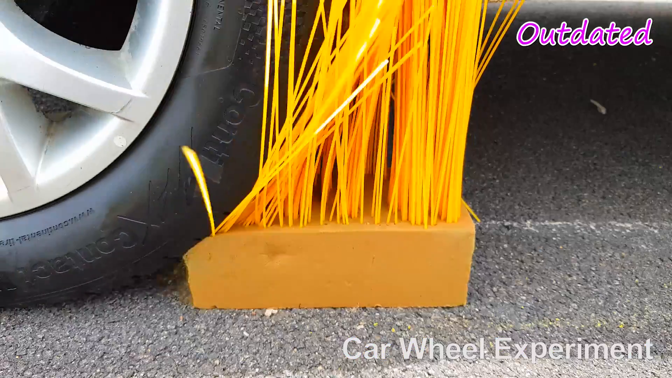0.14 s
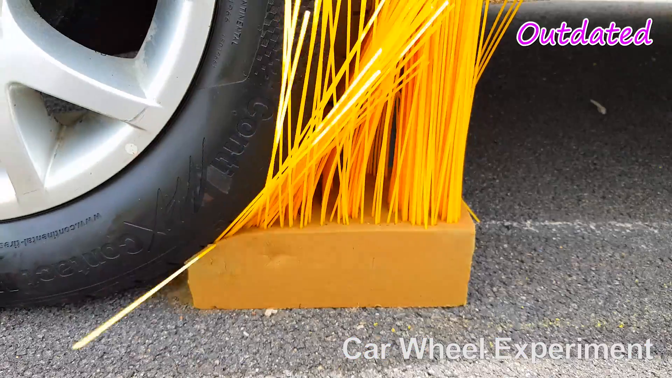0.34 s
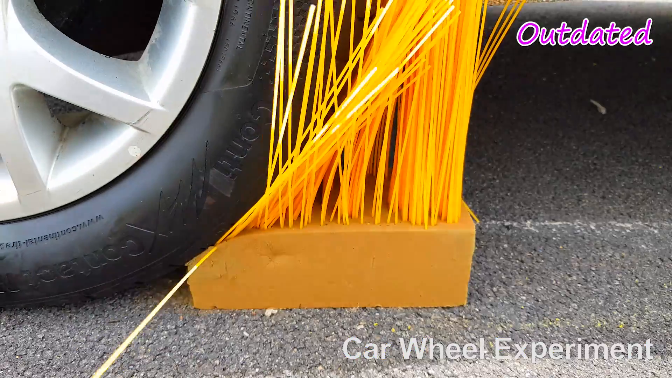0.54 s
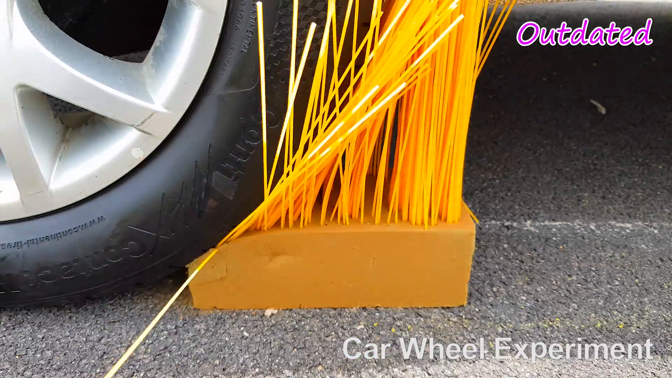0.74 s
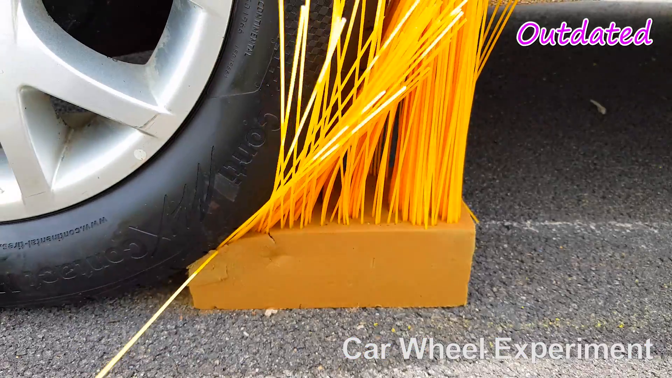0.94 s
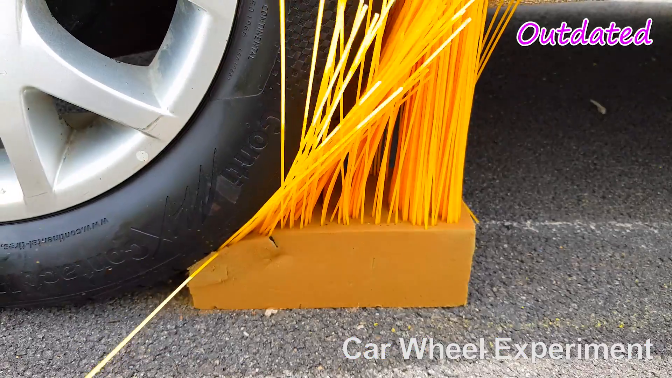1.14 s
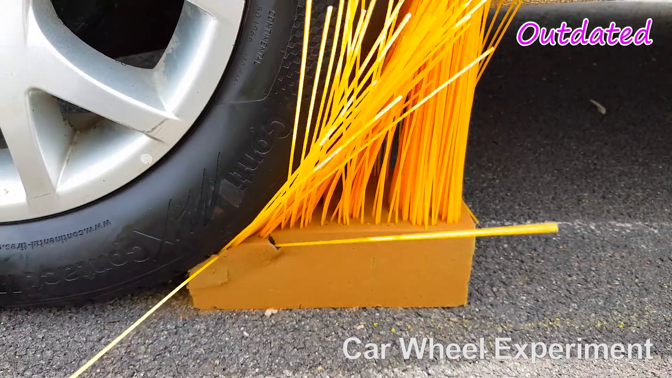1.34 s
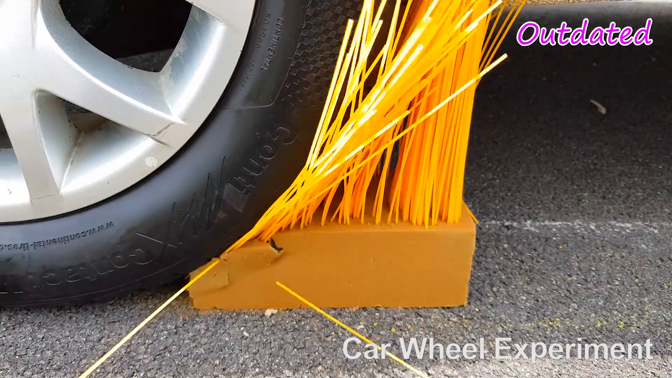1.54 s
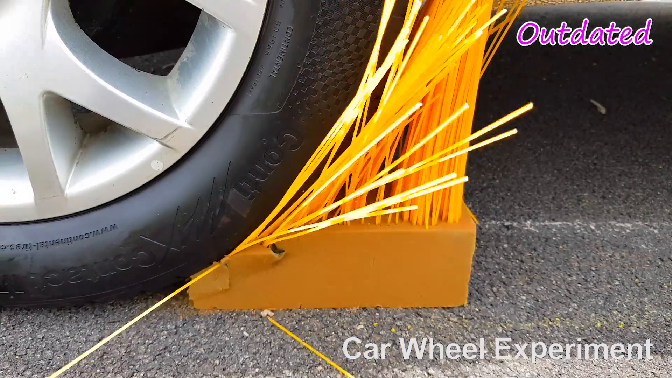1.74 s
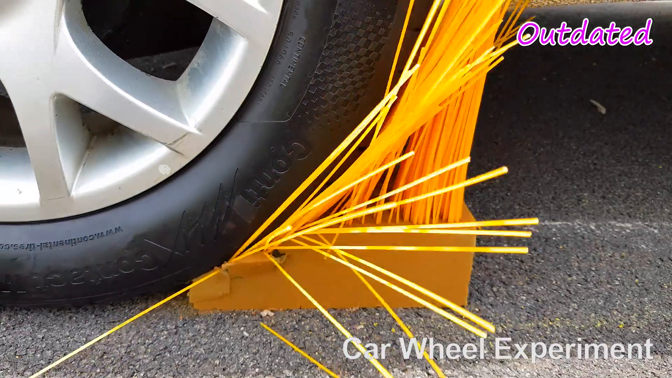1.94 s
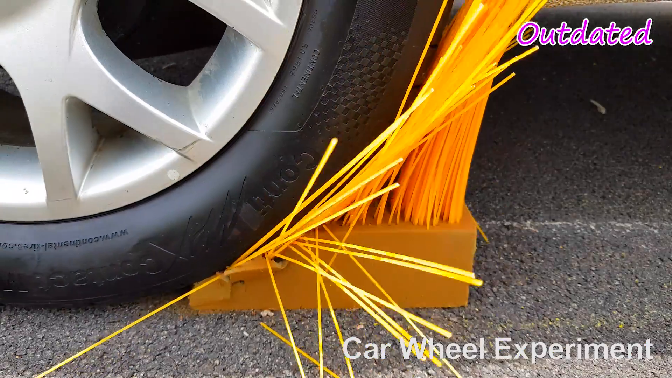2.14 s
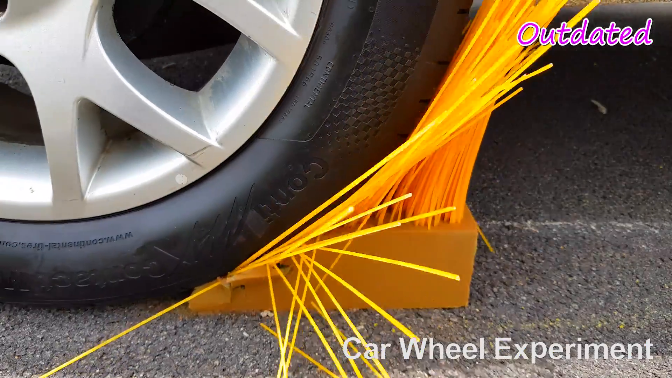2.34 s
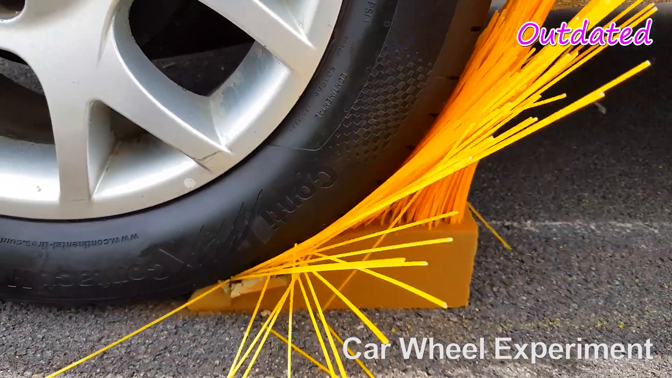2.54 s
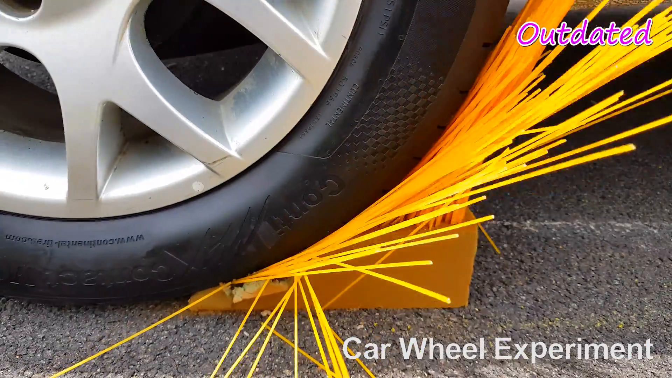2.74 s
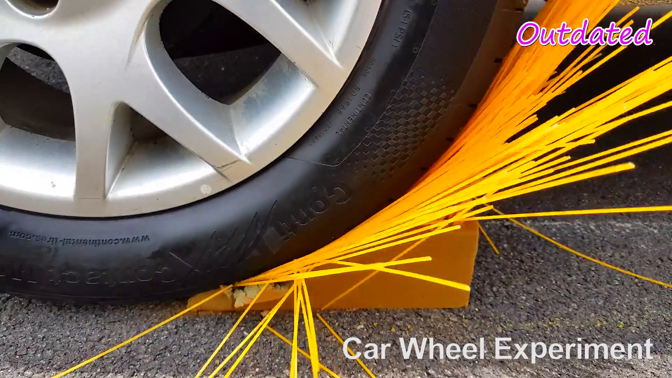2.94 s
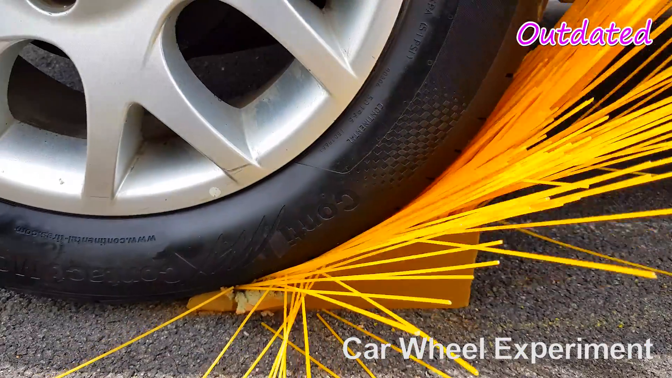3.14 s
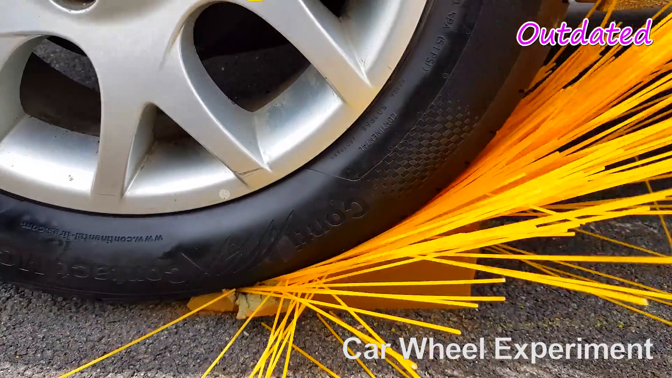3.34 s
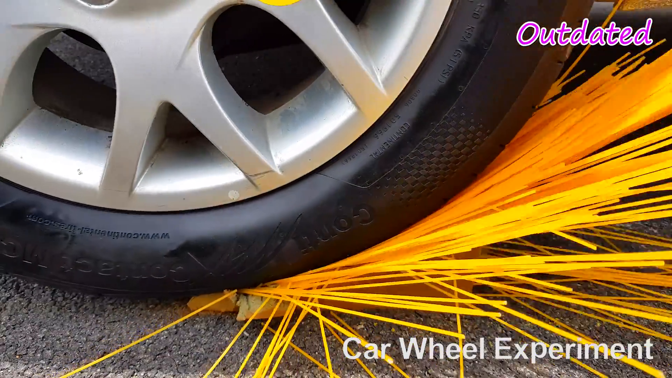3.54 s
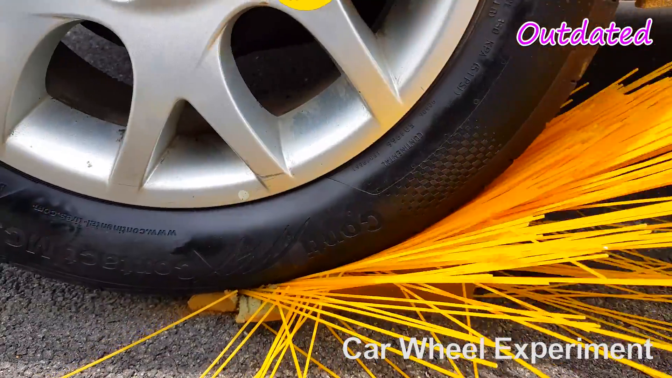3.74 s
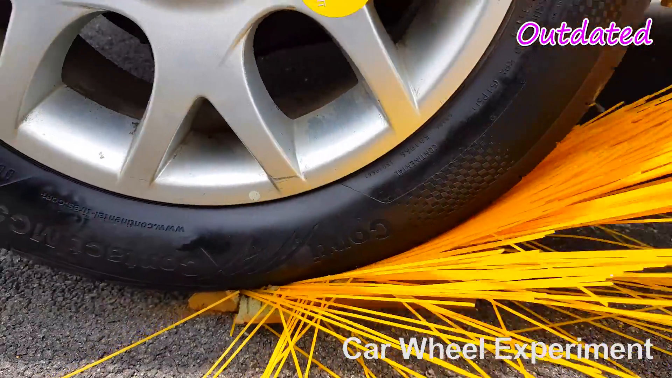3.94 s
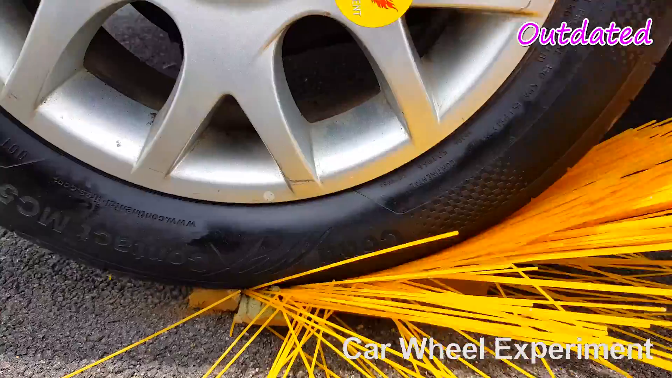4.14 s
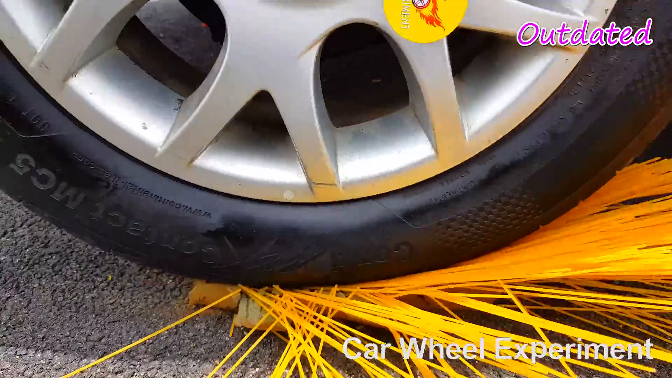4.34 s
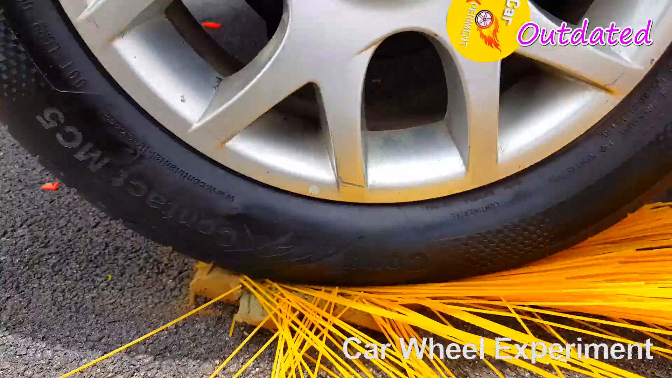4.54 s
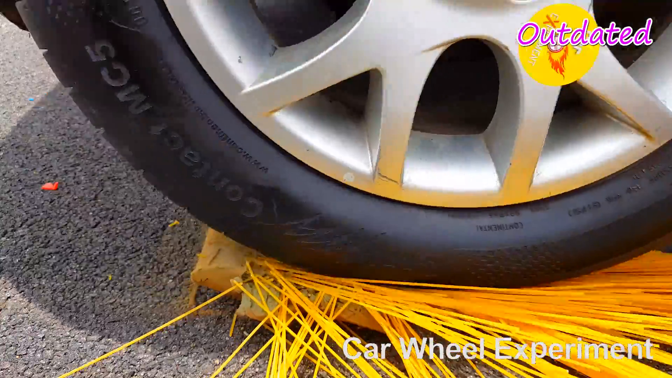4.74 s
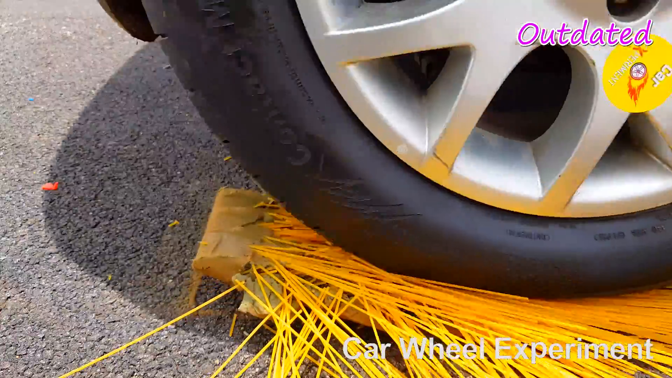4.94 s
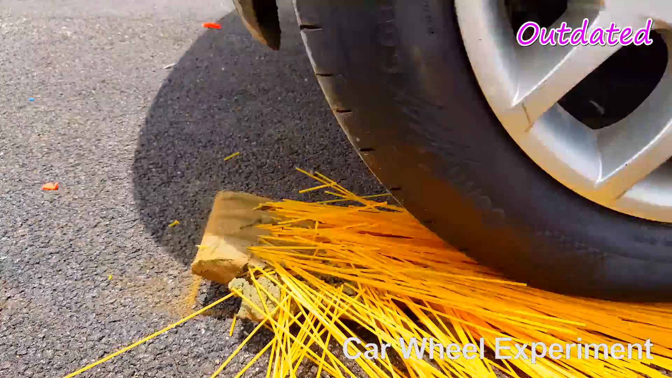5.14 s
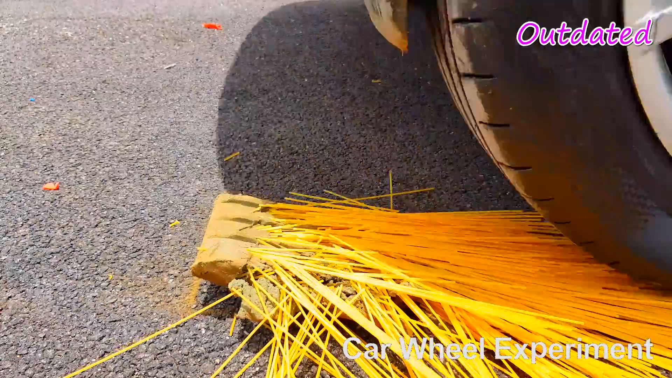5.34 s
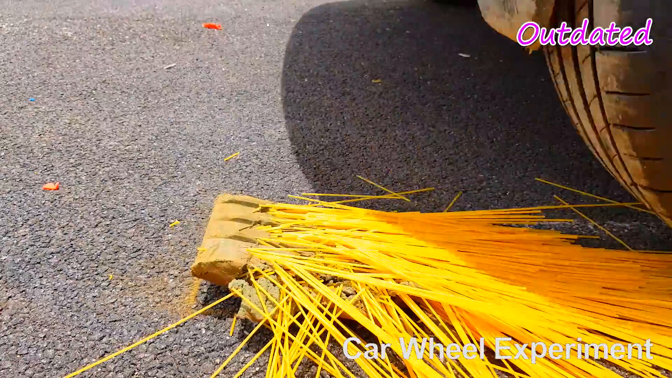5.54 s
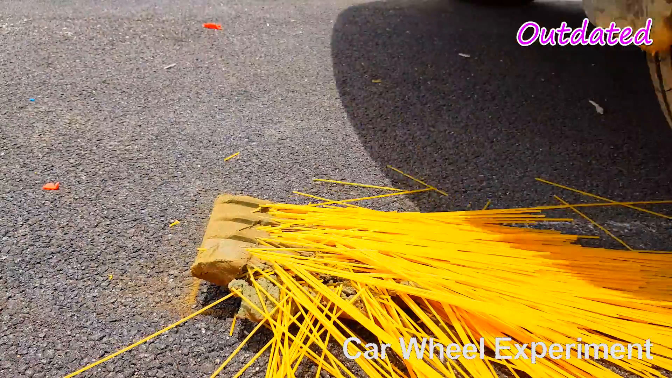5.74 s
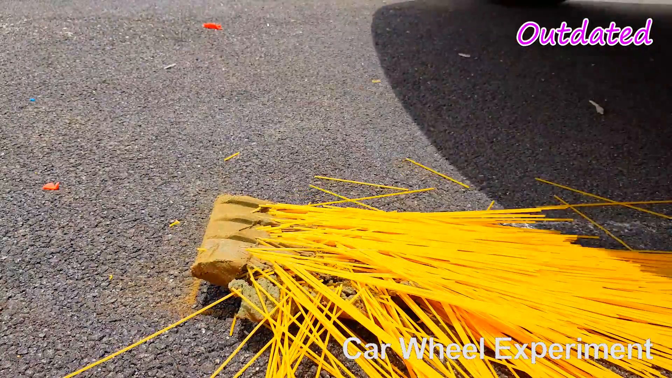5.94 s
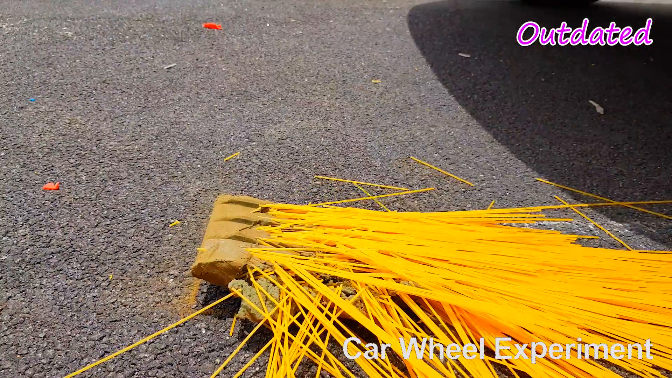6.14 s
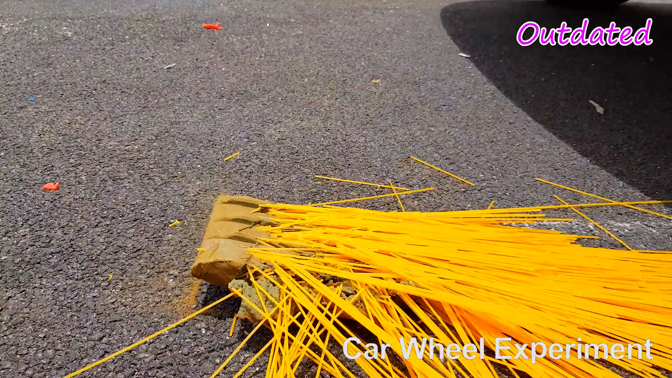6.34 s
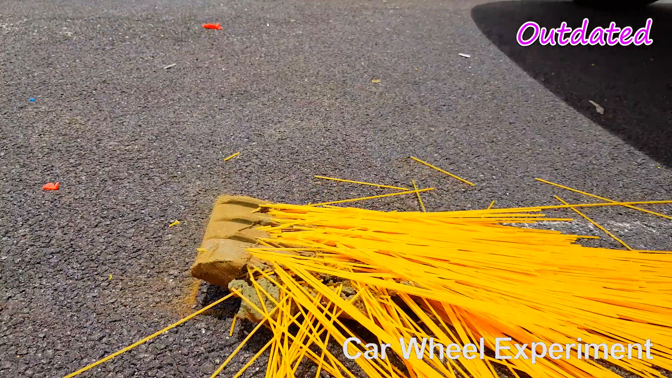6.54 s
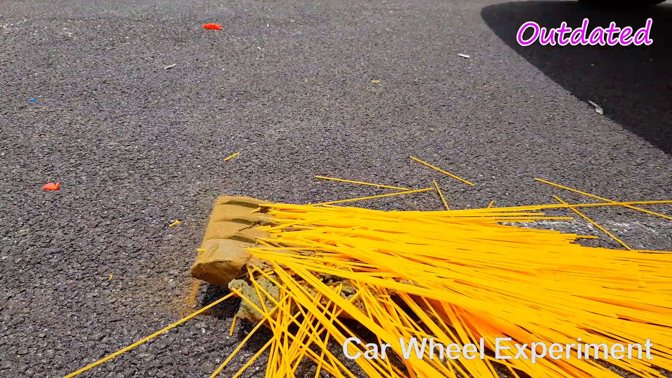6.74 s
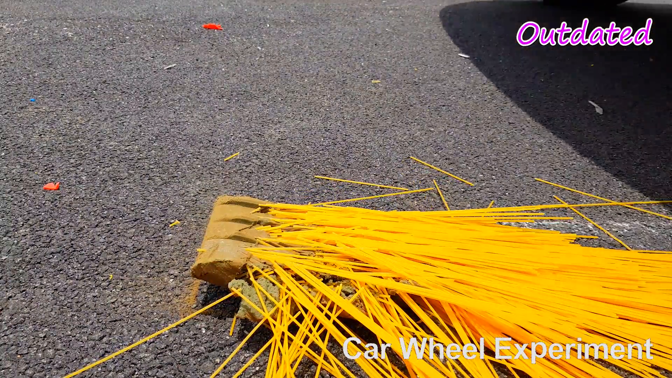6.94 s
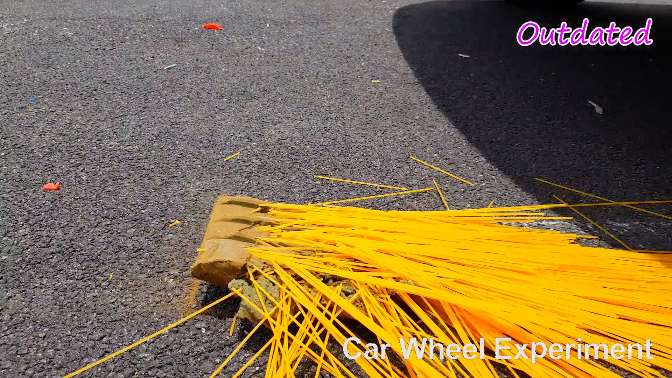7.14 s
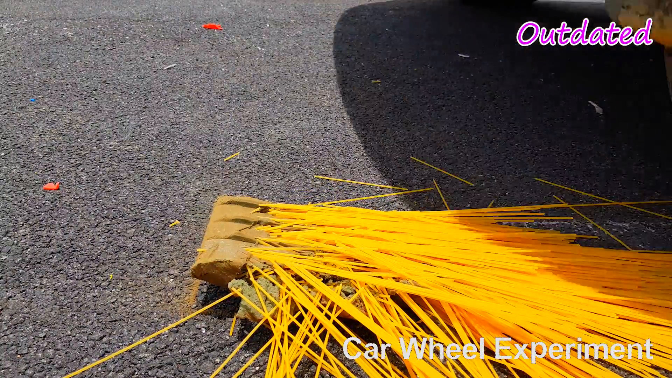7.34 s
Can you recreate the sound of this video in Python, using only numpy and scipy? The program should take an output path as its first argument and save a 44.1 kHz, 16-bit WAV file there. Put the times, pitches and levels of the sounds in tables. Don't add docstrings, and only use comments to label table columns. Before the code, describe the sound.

Very close stereo, outdoors on asphalt: a car tyre creeps over a bundle of dry spaghetti sticks set in a foam block. Sharp woody snaps come rapidly, over fine crackling and dull foam pops. Around five seconds the block collapses with a low, dry crunch. The snapping stops, wind puffs thump on the right side, and the idling engine fades almost to nothing before returning abruptly, clearer, at the end.

```python
import sys
import numpy as np
from scipy import signal
from scipy.fft import rfft, irfft, next_fast_len
from scipy.io import wavfile
from scipy.ndimage import uniform_filter1d

SR = 44100
rng = np.random.default_rng(int(sys.argv[2]) if len(sys.argv) > 2 else 0)


def how_loud(loudness_db):
    steps = np.asarray(loudness_db, float) / 20
    return 10 ** steps


def wav_record(signal):
    frames = np.transpose(np.atleast_2d(signal))
    bounded = np.clip(frames, -1, 1)
    quanta = np.round(bounded * 32767).astype(np.int16)
    wavfile.write(sys.argv[1], SR, quanta)


N = 329868
T_S = np.arange(N) / SR
CUT_S = 6.705


def unit(x):
    return x / np.sqrt(np.mean(x ** 2) + 1e-20)


def along(points, hz):
    f, v = np.transpose(points)
    return np.interp(np.log(hz + 1), np.log(f + 1), v)


def curves(rows):
    s, *cols = np.transpose(rows)
    return [np.interp(T_S, s, c, left=-120, right=-120) for c in cols]


def per_shot(values):
    return np.where(T_S < CUT_S, *values)


def filtered(x, response):
    m = next_fast_len(N + SR // 4)
    return irfft(rfft(x, m) * response(np.fft.rfftfreq(m, 1 / SR)), m)[..., :N]


def coloured(x, points):
    return filtered(x, lambda f: how_loud(along(points, f)))


def modes(table):
    def response(f):
        total = 0
        for k, (hz, width, db) in enumerate(table):
            total = total + (-1) ** k * how_loud(db) * 1j * f * width / (hz * hz - f * f + 1j * f * width)
        return total
    return response


def band(lo_hz, hi_hz):
    return lambda f: 1 / (1 + (lo_hz / (f + 1)) ** 6) / (1 + (f / hi_hz) ** 6)


def pair(alike):
    a, b = rng.standard_normal((2, N))
    turn = np.arccos(np.clip(alike, -1, 1)) / 2
    return np.cos(turn) * a + np.sin(turn) * np.array([b, -b])


def mottled(x, depth_db):
    z = signal.stft(x, nperseg=256)[2]
    field = uniform_filter1d(rng.standard_normal(z.shape[1:]), size=3, axis=0)
    field = uniform_filter1d(field, size=9, axis=1)
    return signal.istft(z * how_loud(depth_db * unit(field)), nperseg=256)[1][:, :N]


# t/s, left lag/samples
DIRECTION = [(0, -4), (1.5, -3.5), (3, -1), (5, 2), (5.6, 17), (7.48, 18)]


def place(times, shapes, scatter):
    lag = np.interp(times, *np.transpose(DIRECTION)) + scatter * rng.standard_normal(len(times))
    start = np.round(times * SR + np.outer([.5, -.5], lag)).astype(int)
    index = np.clip(start[..., None] + np.arange(shapes.shape[-1]), 0, N)
    return np.array([np.bincount(i.ravel(), s.ravel(), N + 1)[:N] for i, s in zip(index, shapes)])


def grains(times, size_db, life_s, alike):
    t = np.arange(96) / SR
    shared = rng.standard_normal((len(times), len(t)))
    own = rng.standard_normal((2, len(times), len(t)))
    share = np.clip(alike, 0, 1)
    burst = np.sqrt(share) * shared + np.sqrt(1 - share) * own
    return place(times, burst * how_loud(size_db[:, None] - 60 * t / life_s), scatter=1.5)


def shower(count, spread_db, life_s, alike):
    times = rng.uniform(0, N / SR, count)
    return grains(times, spread_db * rng.exponential(size=count).clip(0, 3), life_s, alike)


# f/Hz, t60/s
UNDERSIDE_DECAY = [(500, 0.042), (3000, 0.054), (12000, 0.045)]


def underside(x):
    hz, t, z = signal.stft(pair(0.94)[:, :SR // 6], SR, nperseg=128)
    decay = how_loud(-60 * t / along(UNDERSIDE_DECAY, hz)[:, None])
    tail = signal.istft(z * decay, SR, nperseg=128)[1]
    return signal.fftconvolve(x, tail / np.linalg.norm(tail[0]), axes=1)[:, :N]


# f/Hz, width/Hz, level/dB
BAY_MODES = [(388, 45, 7.5), (473, 57, 7), (540.3, 45, 9.5), (842, 127, 6), (1280, 36, -5)]


def engine_bay(force, body_db, shade):
    def ring(f):
        return modes(BAY_MODES)(f) ** 2 * band(340, 1600)(f) * (1 - band(620, 750)(f)) ** 2
    bay = unit(filtered(pair(.7) * (.8 + force), ring))
    bay = bay - shade * filtered(bay, band(570, 1200))
    lower = unit(filtered(pair(0.72), band(260, 380))) * how_loud(-5.5) * (T_S > CUT_S)
    return how_loud(body_db) * (bay + lower)


# f/Hz, width/Hz, level/dB
COVER_MODES = [
    [(1230, 115, 6.5), (1692, 690, 1.5), (3200, 1270, 1), (4060, 650, 3.5), (4670, 160, 1)],
    [(1240, 490, 7.5), (1770, 170, 8.5), (1880, 206, 8), (2970, 1160, 3), (4070, 700, 3.5), (4750, 300, -1.5)],
]


def valve_cover(force, phase, clatter_db, shade):
    def lag(f):
        samples = DIRECTION[-1][1]
        return np.exp(-1j * np.pi * f / SR * np.array([[samples], [-samples]]))
    knock = np.exp(-6 * (phase % 1)) + per_shot((.8, .2)) * np.exp(-6 * ((phase + .5) % 1))
    drive = per_shot((.5, .35)) + 0.83 * force + per_shot((.3, .7)) * knock
    valves = mottled(pair(0.66), depth_db=2.0) * drive
    first, second = (unit(filtered(valves, lambda f: modes(table)(f) ** 2 * band(950, 4900)(f) * lag(f)))
                     for table in COVER_MODES)
    first = first - shade * filtered(first, band(1900, 3800))
    return how_loud(clatter_db) * per_shot((first, second))


# f/Hz, level/dB per Hz
FAN_SPECTRUM = [(4200, -12.5), (5600, -8), (6600, -0.5), (8000, -4.5), (12000, -3), (12600, -8.5),
                (16000, -17)]


def fan(fan_db):
    return how_loud(fan_db) * unit(coloured(pair(0.26), FAN_SPECTRUM))


def exhaust(phase, force):
    fall_db_per_s = 7.5
    throb_db = per_shot((-53.5, -59.5)) - fall_db_per_s * T_S * (T_S < CUT_S)
    beat = 0.45 + np.cos(np.pi * (phase + per_shot((.41, .2)))) ** 4 + 0.32 * force
    pipe = lambda f: modes([(195, 70, 0)])(f) * band(165, 240)(f) ** 2
    return how_loud(throb_db) * unit(filtered(pair(0.89) * beat, pipe))


def rumble():
    hum_hz, hum_db = 87.7, -77.5
    hum = how_loud(hum_db) * np.sqrt(2) * np.sin(2 * np.pi * hum_hz * T_S) * (T_S < 5.5)
    return how_loud(per_shot((-75.5, -70))) * unit(filtered(pair(0.49), band(25, 120))) + hum


# t/s, level/dB
IDLE_FADE = [(0, -1), (5, 4.5), (5.45, -2), (5.8, -5), (6.15, -10), (6.22, -19.5), (6.55, -24.5),
             (6.69, -36), (6.712, -32), (6.74, -0.5), (7.48, -2.5)]


def engine():
    cycle_s, knock_at_s = per_shot((.1436, .1358)), per_shot((2.2, 6.81))
    fade_db, = curves(IDLE_FADE)
    phase = (T_S - knock_at_s) / cycle_s
    stroke = np.floor(4 * phase).astype(int)
    force = how_loud(3 * rng.standard_normal((2, 400)))[:, stroke] * np.exp(-2.5 * (4 * phase % 1))
    shade = np.clip(-fade_db / 21, 0, .9) * (T_S < CUT_S)
    bay = engine_bay(force[0], per_shot((-52, -47)) + 0.52 * fade_db, shade)
    cover = valve_cover(force[1], phase, per_shot((-48, -47)) + 0.77 * fade_db, shade)
    air = fan(per_shot((-54, -61)) + 1.22 * fade_db)
    return bay + cover + air + exhaust(phase, force[0]) + rumble()


# t/s, level/dB, f/Hz, half length/s
PUFFS = [(1.33, -79, 110, .03), (1.67, -72, 60, 0.027), (2.6, -76, 117, 0.059), (3.2, -81, 50, .03),
         (3.58, -68, 185, 0.02), (3.85, -82, 120, .04), (4.365, -73, 69.5, 0.029),
         (4.498, -70, 59.7, 0.015), (5.259, -64, 44.4, 0.05), (5.594, -55.5, 76, 0.034),
         (5.69, -45.5, 208, 0.041), (5.735, -57, 67, 0.058), (5.914, -60, 126, 0.053),
         (6.042, -69, 262, 0.085), (6.102, -46.5, 235, 0.055), (6.133, -61, 74.3, 0.043),
         (6.434, -77.5, 170, 0.039), (6.599, -59.5, 69.6, 0.021), (6.64, -74.5, 321, 0.026),
         (6.842, -67, 110, .04), (7.207, -54, 125.6, 0.025)]


def wind():
    sound = np.zeros((2, N))
    for s, db, hz, half_s in PUFFS:
        at = slice(round((s - .12) * SR), round((s + .12) * SR))
        t = T_S[at]
        gust = mottled(rng.standard_normal((2, SR // 4)), depth_db=6.5)
        sos = signal.butter(3, [hz / 1.6, hz * 1.79], "band", fs=SR, output="sos")
        air = signal.sosfilt(sos, gust)[:, -len(t):]
        sound[:, at] += how_loud(db + 15.5) * unit(air) * np.exp(-((t - s) / half_s) ** 2)
    return sound * how_loud([[-8], [0]])


# t/s, hold/s, level/dB
COLLAPSE_EVENTS = [
    (4.891, 0.063, -30.5),
    (4.972, 0.011, -27),
    (5.001, 0.036, -27.5),
    (5.088, 0.016, -34.5),
    (5.122, 0.022, -37.5),
]


def collapse():
    rise_s, fall_s = 0.0086, 0.012
    gain = 0
    for s, hold_s, db in COLLAPSE_EVENTS:
        before = np.clip(s - T_S, 0, None) / rise_s
        after = np.clip(T_S - s - hold_s, 0, None) / fall_s
        gain = gain + how_loud(db - 20 * (before + after))
    return gain


# t/s, peak/dB, f/Hz
POCKETS = [(0.563, -14.5, 1250), (2.59, -15.5, 840), (3.299, -25.5, 970), (3.359, -26, 870),
           (3.533, -18, 880), (4.879, -35, 910), (4.899, -22.5, 525), (4.94, -15, 810), (4.973, -20, 510),
           (5.0, -16, 800), (5.008, -35, 513), (5.015, -10.5, 500), (5.032, -24, 870), (5.085, -23, 500),
           (5.13, -23, 870), (5.166, -19, 990), (5.209, -17.5, 755), (5.216, -23, 395), (5.247, -24, 1110),
           (5.316, -22.5, 1280)]


def foam_pockets():
    s, peak_db, hz = np.transpose(POCKETS)[..., None]
    cycles = hz * np.arange(600) / SR
    knocks = how_loud(peak_db + 8.0) * cycles * np.exp(-cycles / 0.71) * np.sin(2 * np.pi * cycles)
    return place(s[:, 0], np.array([knocks, knocks]), scatter=.3)


# f/Hz, width/Hz, level/dB
CELL_MODES = [(444.4, 62, -5.5), (846, 69, -1), (1250, 180, -9.5)]
# f/Hz, width/Hz, level/dB
BLOCK_MODES = [(500, 260, -3), (926, 170, -2.5), (1250, 670, -14)]
# t/s, level/dB
TYRE_LOAD = [(0, -25), (.38, -34.5), (.42, -43.5), (.65, -33.5), (.92, -43), (1.2, -42), (1.4, -38),
             (1.7, -37.5), (2, -35), (2.37, -37), (3, -35.5), (3.95, -35.5), (4.4, -37.5), (4.8, -40),
             (5.05, -38), (5.25, -42.5), (5.45, -63.5), (5.7, -67)]


def foam():
    cells = shower(count=3000, spread_db=7.0, life_s=0.01, alike=0.59)
    cell_db = -44 + 0.18 * (curves(TYRE_LOAD)[0] + 35.5)
    dull = unit(filtered(cells, modes(CELL_MODES))) * how_loud(cell_db) * (np.arange(N) < TYRE_LOAD[-1][0] * SR)
    crumbs = shower(count=9000, spread_db=0.5, life_s=0.0037, alike=0.91)
    crush = unit(filtered(crumbs, modes(BLOCK_MODES))) * collapse()
    return dull + crush + foam_pockets()


# f/Hz, level/dB per Hz
STICK_SPECTRUM = [(600, 5.5), (1000, 7.5), (2600, 7), (4400, 7), (6500, -5.5), (9000, -30.5)]
# f/Hz, level/dB per Hz
SPLINTER_SPECTRUM = [(3500, -33), (5500, -14.5), (8500, -0.5), (12000, 1.5), (12800, -6.5), (16000, -8)]


def crackle(sticks):
    def busy(size):
        return np.abs(uniform_filter1d(np.sum(sticks ** 2, axis=0), size=size)) + 1e-7
    load = how_loud(curves(TYRE_LOAD)[0] + 1) * (busy(size=1300) / busy(size=11000)) ** 0.071
    breaks = shower(count=6000, spread_db=4.0, life_s=0.0025, alike=0.33)
    breaks = breaks + 1.2 * underside(breaks)
    splinter_gain = how_loud(-2.5) * load + how_loud(-12.5) * collapse()
    splinters = splinter_gain * unit(coloured(breaks, SPLINTER_SPECTRUM))
    return load * unit(coloured(breaks, STICK_SPECTRUM)) + splinters


def loose_ends(s, peak_db):
    luck = rng.random((len(s), 2, 3))
    times = s + .001 - .005 * np.log(luck[:, 0])
    size_db = peak_db - 15 - 10 * luck[:, 1]
    ends = grains(times.ravel(), size_db.ravel(), life_s=.003, alike=.8)
    return filtered(ends, lambda f: how_loud(along(STICK_SPECTRUM, f)) + 1.6 * how_loud(along(SPLINTER_SPECTRUM, f)))


# t/s, peak/dB, ring f/Hz, crack/dB
STICK_SNAPS = [(0.0025, -13.5, 5010, 2), (0.0054, -6, 6060, -3), (0.0111, -17, 1807, -7),
               (0.0211, -14.5, 1803, -15), (0.0292, -17.5, 1480, -13), (0.0459, -19.5, 1600, -15),
               (0.074, -18, 4310, 4), (0.0805, -10.5, 3144, -8.5), (0.0903, -18.5, 3720, -10.5),
               (0.1019, -17, 4110, 10.5), (0.1146, -10.5, 2464, -11), (0.122, -16.5, 1966, 3),
               (0.1483, -14, 2980, -0.5), (0.1674, -9.5, 3630, 3), (0.1721, -9.5, 2630, -15.5),
               (0.2006, -10, 1920, -11), (0.2059, -19, 4240, -4), (0.2132, -8, 4000, -2),
               (0.2491, -23, 2520, 4.5), (0.2805, -11, 2000, -8.5), (0.2927, -14.5, 2380, -4),
               (0.3178, -16, 3990, -8), (0.327, -8.5, 2430, -4.5), (0.3398, -20.5, 2270, -16.5),
               (0.3593, -22.5, 1770, -6), (0.3643, -9.5, 3800, -14), (0.377, -13, 1500, -9),
               (0.3883, -13.5, 1250, -1), (0.4293, -6, 2880, -11), (0.4365, -18.5, 2240, -15),
               (0.45, -15.5, 1315, -12), (0.4755, -11.5, 4380, -7.5), (0.4849, -16, 3580, -8.5),
               (0.5183, -16.5, 1354, -4.5), (0.5263, -19.5, 1250, -4.5), (0.5367, -13.5, 2910, -3.5),
               (0.549, -21, 4420, -10.5), (0.5614, -14, 3800, -6), (0.5716, -12, 4290, -5),
               (0.557, -6, 4400, -4), (0.5845, -21.5, 5630, 2), (0.5935, -19.5, 1250, -1),
               (0.6192, -17.5, 4080, -6.5), (0.6283, -11, 2380, -4), (0.6362, -22.5, 3750, -11),
               (0.6589, -15, 4260, -2.5), (0.7012, -24.5, 2450, 0), (0.7096, -16.5, 4750, 1.5),
               (0.7281, -23.5, 4060, 6), (0.7354, -24.5, 1210, 6),
               (0.7561, -16.5, 2730, 0), (0.7923, -19.5, 3800, -6.5), (0.8124, -11, 3040, -0.5),
        (0.8387, -18, 3400, 2), (0.8757, -10.5, 2810, -8), (0.8896, -19.5, 5100, -1), (0.898, -24, 4740, 5),
        (1.0676, -18, 4730, -5.5), (1.112, -27, 3000, 6.5), (1.142, -25.5, 2760, 3.5),
        (1.2128, -23, 2800, 3.5), (1.2458, -11, 2900, -6.5), (1.2562, -13.5, 4050, 0),
        (1.272, -8.5, 4340, -15), (1.0205, -38, 4060, 4), (1.3357, -22, 2950, -2),
        (1.3732, -22.5, 2450, -7), (1.4085, -19, 5600, -4), (1.431, -17.5, 2680, 1.5),
        (1.44, -18.5, 4770, 3), (1.455, -20.5, 2370, 1), (1.462, -25.5, 5640, 7), (1.5382, -8, 4370, -7.5),
        (1.576, -8.5, 2940, -5.5), (1.646, -26.5, 2260, 5.5), (1.7534, -11, 3850, -1.5),
        (1.7674, -33.5, 1980, 7.5), (1.7707, -14, 3060, -2), (1.834, -15, 2140, 1),
        (1.8448, -11.5, 3700, -3.5), (1.854, -19, 5990, 1), (1.881, -28.5, 1340, 10),
        (1.8939, -6, 4060, -3.5), (1.911, -5, 4060, -13), (1.9191, -28.5, 3960, -8),
        (1.9235, -5, 3920, -7.5), (1.9283, -15.5, 3790, -6), (2.0068, -17.5, 2950, -9.5),
        (2.012, -21.5, 1180, -7), (2.0225, -17.5, 2620, -2.5), (2.026, -26, 2020, -7.5),
        (2.0368, -26, 2630, 7.5), (2.0748, -19, 1250, -3), (2.0855, -19, 4330, -5.5),
        (2.107, -15, 2410, -10),
               (2.1161, -17, 2400, -12), (2.1645, -18, 2200, -2.5), (2.18, -26.5, 2970, 2),
          (2.1972, -27.5, 4260, 8.5), (2.209, -18.5, 2290, -6.5), (2.3086, -32.5, 2408, 15),
          (2.3988, -20, 2990, -4.5), (2.4044, -6, 2540, -2), (2.439, -13.5, 2415, -7.5),
          (2.463, -8.5, 3405, -2.5), (2.47, -24, 2970, -5), (2.479, -14, 2530, -14.5),
          (2.506, -20, 2990, -10.5), (2.539, -21.5, 2970, -7.5), (2.5948, -13, 2600, -2),
          (2.611, -18.5, 4010, -2.5), (2.625, -21, 3850, -3), (2.636, -16.5, 3900, -15),
          (2.6756, -7.5, 2390, -2), (2.6815, -10.5, 3500, -12.5), (2.694, -23.5, 2540, 6.5),
          (2.741, -14.5, 3230, 2.5), (2.7792, -8.5, 2400, -4.5), (2.794, -15.5, 2095, -1.5),
          (2.798, -17.5, 2110, -2.5), (2.806, -23.5, 2840, 2.5), (2.8297, -7, 3350, -4.5),
          (2.8368, -16, 4310, 1), (2.8443, -18.5, 2080, -3.5), (2.852, -19.5, 2280, -4.5),
          (2.8672, -23, 3860, 3), (2.885, -24, 5590, 15), (2.891, -10, 2960, -11),
          (2.944, -26.5, 2840, 1.5), (2.955, -7.5, 3000, -7.5), (2.969, -25, 2900, -3),
          (2.977, -12.5, 3970, -1), (2.9846, -17.5, 2830, -6.5), (3.025, -22, 1460, -6.5),
          (3.0425, -8, 3960, -2), (3.0523, -17, 2430, 4.5), (3.0625, -17.5, 2780, -6.5),
          (3.0764, -9.5, 3740, 1), (3.0938, -11.5, 2600, -8.5), (3.1103, -27.5, 4280, 13),
          (3.131, -14, 1420, -10), (3.1648, -15.5, 3580, -3.5), (3.1813, -24, 2520, -13.5),
               (3.1963, -4.5, 2870, -10.5), (3.201, -20, 2500, -4), (3.2271, -15, 2660, -15),
           (3.2594, -14, 3830, -3), (3.2942, -12, 1300, -14.5), (3.353, -11, 2100, -18),
           (3.3673, -18, 2730, -11), (3.3796, -8.5, 3360, -9), (3.3865, -23.5, 3190, -7),
           (3.392, -11.5, 2480, -15.5), (3.406, -19.5, 2870, -1.5), (3.447, -20, 2820, -6.5),
           (3.4692, -20.5, 3100, -15), (3.5022, -18.5, 2540, -13), (3.5213, -18.5, 1380, -16.5),
           (3.5327, -16.5, 2690, -16.5), (3.5418, -17.5, 3940, -4), (3.551, -24, 3490, -4.5),
           (3.5773, -19, 1290, -13), (3.601, -17, 1290, -12.5), (3.6516, -28, 4020, 4.5),
           (3.6793, -18, 1300, -6.5), (3.69, -28.5, 3870, 11.5), (3.706, -10, 4230, -2),
           (3.7535, -23, 2710, -11.5), (3.7665, -24.5, 1500, 1.5), (3.779, -16.5, 4310, -12.5),
           (3.7861, -18.5, 2570, -8.5), (3.805, -20.5, 2100, 1), (3.8166, -24, 3880, -4),
           (3.8258, -13, 2760, -14), (3.834, -23, 3880, -1.5), (3.8433, -15, 4900, -7),
           (3.85, -17.5, 1490, -8), (3.8746, -20, 4000, -15.5), (3.9097, -22.5, 2420, -15.5),
           (3.995, -21, 2890, -14), (4.0134, -24, 4310, 1), (4.0666, -15, 4180, -5),
           (4.0858, -17.5, 2410, -18), (4.0994, -23, 1830, -10.5), (4.1083, -25.5, 2890, -7.5),
           (4.1166, -21, 1920, -12),
               (4.148, -25, 2580, -8.5), (4.161, -22.5, 1840, -11), (4.1866, -18, 1990, -13.5),
               (4.2128, -19.5, 2580, -6), (4.2177, -23, 2800, -12), (4.2295, -20, 4130, -9.5),
               (4.2766, -24, 3570, -14.5), (4.2971, -15, 2800, -13.5), (4.319, -19.5, 3620, -8.5),
               (4.335, -21.5, 4300, -4.5), (4.349, -23.5, 4390, 3), (4.3694, -23, 2850, -11),
               (4.423, -19.5, 3160, -18.5), (4.4326, -20, 2370, -15), (4.4472, -21, 4260, -12.5),
               (4.4722, -13, 3270, -11), (4.4854, -13, 3830, -2.5), (4.4998, -17, 3720, -1.5),
               (4.512, -23.5, 3660, -14), (4.526, -14.5, 3660, -5), (4.5391, -21, 3790, -4),
               (4.559, -19.5, 3800, -1.5), (4.635, -21, 4200, 2), (4.6397, -29, 5170, 9),
               (4.657, -23, 4180, 6), (4.6866, -17, 3400, 2), (4.697, -16, 4450, -2.5),
               (4.7198, -26, 1430, -1), (4.7329, -17.5, 4640, 2), (4.7592, -22.5, 3440, 6.5),
               (4.805, -23.5, 2860, 1), (4.859, -23.5, 1940, 4), (4.8935, -20.5, 3750, 5),
               (4.9367, -22, 3550, 1.5), (4.996, -25.5, 1160, 6), (5.0026, -22, 890, 10),
               (5.0085, -24.5, 895, 7), (5.0158, -28.5, 890, 2), (5.0204, -42, 900, 1.5),
               (5.032, -28.5, 904, 13.5), (5.083, -32, 1460, 16), (5.1384, -20, 1460, -3),
               (5.2109, -23.5, 880, -4.5), (5.248, -31, 5000, 11.5), (5.2886, -26, 4000, 2.5)]
TYRE_GRIT = [
    (5.367, -40, 2130, -3),
    (5.503, -42, 2150, -9),
    (6.998, -39, 5600, -4),
    (6.999, -39, 1800, -25),
    (7.105, -54, 5500, 8),
    (7.114, -52, 5500, 8),
]


def snaps():
    table = STICK_SNAPS + TYRE_GRIT
    s, peak_db, hz, crack_db = np.transpose(table)[..., None]
    t = np.arange(512) / SR
    noise = rng.standard_normal((3, len(table), len(t)))

    def peak_one(x):
        return x / np.abs(x).max(axis=(0, 2), keepdims=True)

    def burst(own, t60_s):
        return (noise[0] + own * noise[1:]) * (1 - np.exp(-t / .0004)) * how_loud(-60 * t / t60_s)

    cycles = hz * t
    ring = cycles * np.exp(-cycles / .9 - t / .0015) * np.sin(2 * np.pi * cycles)
    bright = signal.butter(2, [6300, 14000], "band", fs=SR, output="sos")
    crack = signal.sosfilt(bright, burst(own=1.8, t60_s=.0065))
    blow = burst(own=.6, t60_s=.0045 + 7 / hz)
    f = np.fft.rfftfreq(len(t), 1 / SR)
    octaves = np.log2((f + 1) / hz)
    rasp_gain = how_loud(np.minimum(9 * octaves, -3 * octaves)) * band(900, 5600)(f)
    rasp = irfft(rfft(blow) * rasp_gain, len(t))

    side_db = 1.5 * rng.standard_normal((len(table), 1)) * np.array([[[1]], [[-1]]])
    bend = peak_one(peak_one(ring[None]) + 0.97 * peak_one(rasp))
    shapes = how_loud(peak_db + 1.0 + side_db) * (bend + how_loud(crack_db) * peak_one(crack))
    parts = [place(s[k::2, 0], shapes[:, k::2], scatter=.7) for k in range(2)]
    parts[0] = parts[0] + loose_ends(s, peak_db)
    block = filtered(sum(parts), modes(CELL_MODES)) * how_loud(3)
    return block + sum(p + how_loud(-7.5) * underside(p) for p in parts)


def scene():
    sticks = snaps()
    breaking = sticks + crackle(sticks) + foam()
    return engine() + wind() + filtered(breaking, lambda f: band(345, SR)(f) ** 2)


# f/Hz, left-right level/dB
PORT_COLOUR = [(100, 2), (380, -1), (1000, 0.7), (2400, 0.4), (4400, -6), (8100, 4.5), (14000, -0.5)]


def microphone(x):
    top_hz = 15850

    def response(f):
        edge_db = -42 * (f > top_hz) - 60 * (f > top_hz + 1000)
        return how_loud(along(PORT_COLOUR, f) * np.array([[.5], [-.5]]) + edge_db) * (f > 20)
    return filtered(x, response)


def low_pass(x):
    return signal.sosfilt(signal.butter(12, 16930, fs=SR, output="sos"), x)


def record(dry):
    soft = dry / (1 + (dry / .9) ** 4) ** (1 / 4)
    mix = microphone(soft)
    return low_pass(mix)


dry = scene()
out = record(dry)
wav_record(out)
```